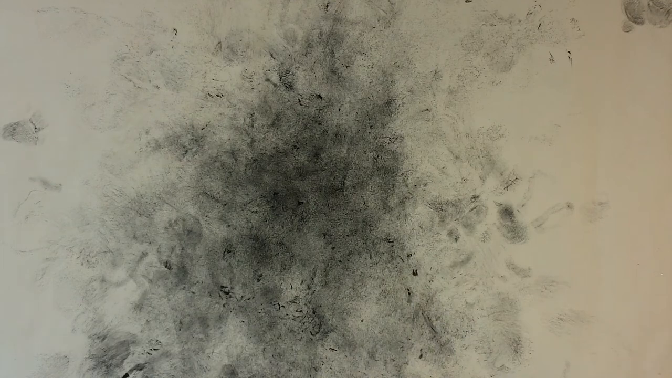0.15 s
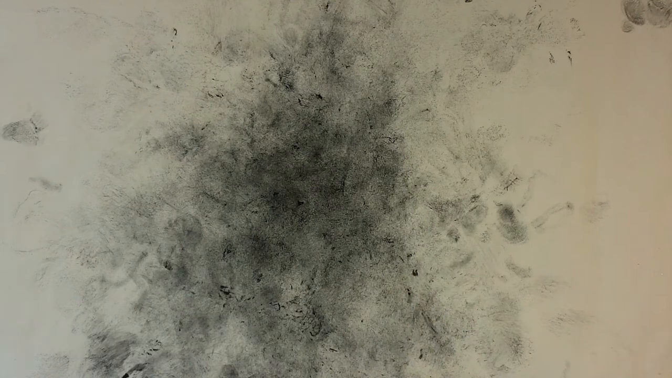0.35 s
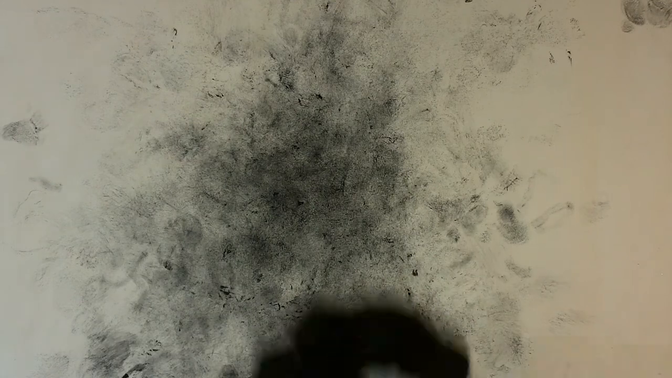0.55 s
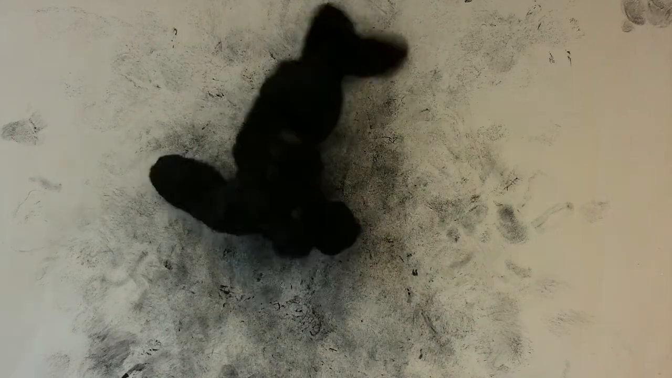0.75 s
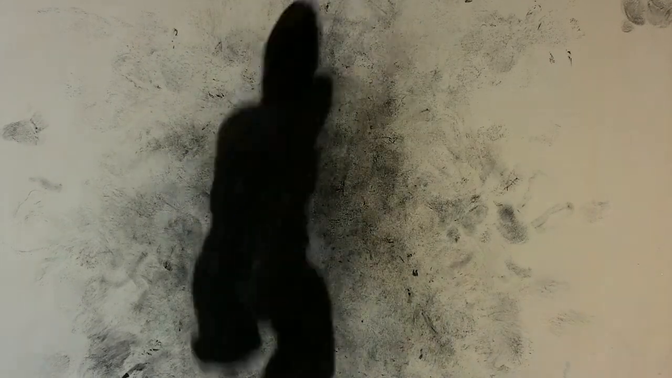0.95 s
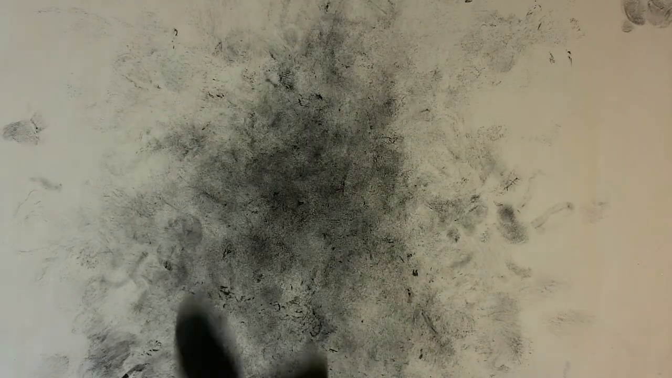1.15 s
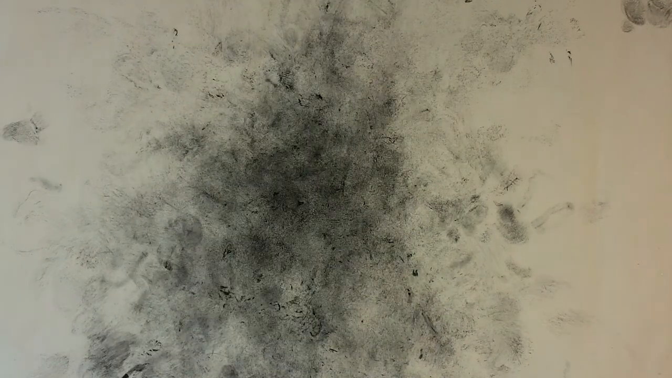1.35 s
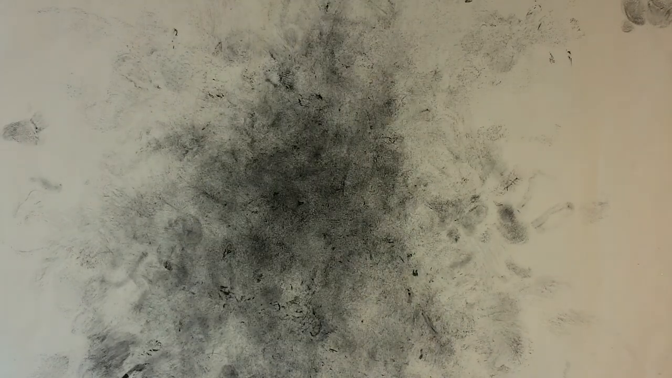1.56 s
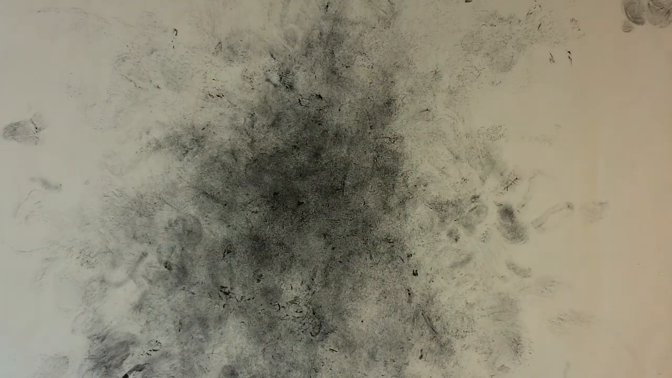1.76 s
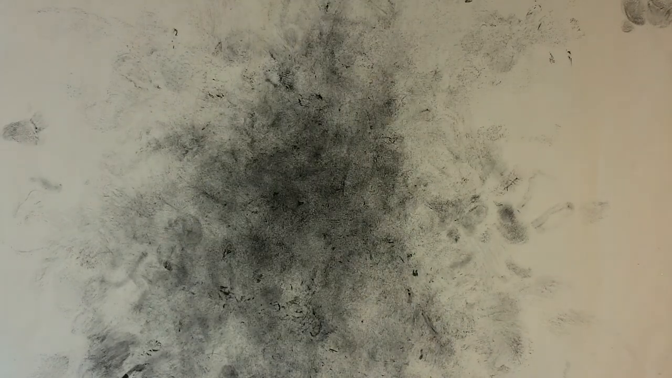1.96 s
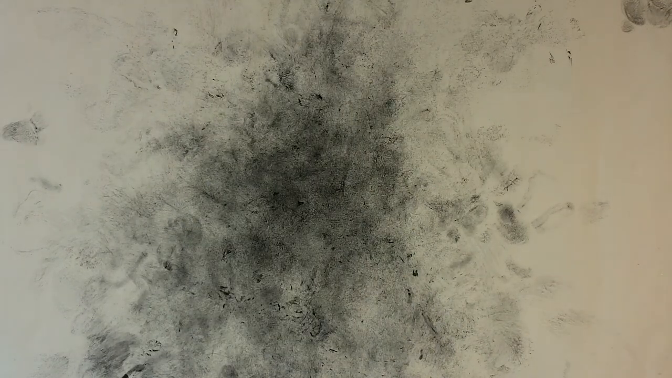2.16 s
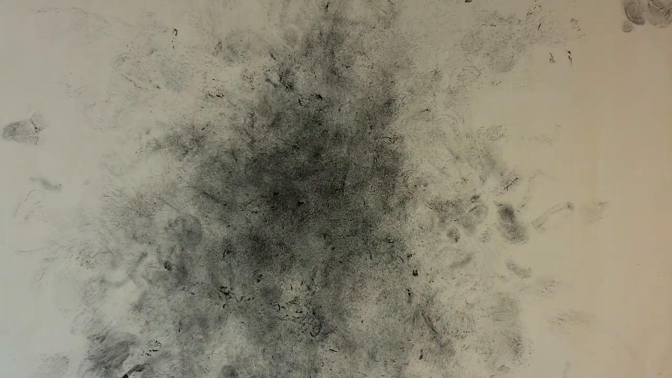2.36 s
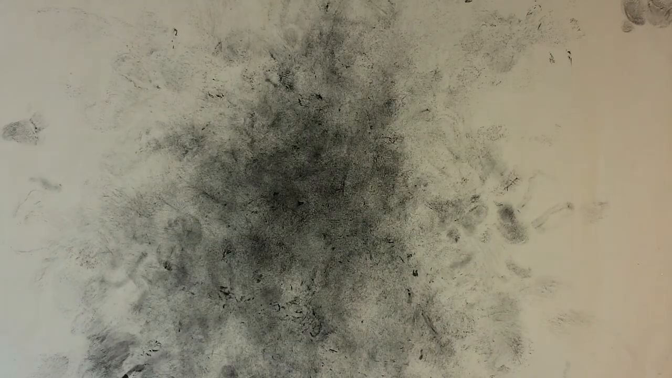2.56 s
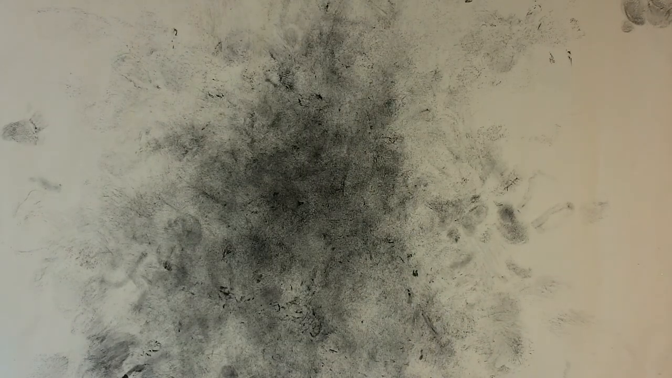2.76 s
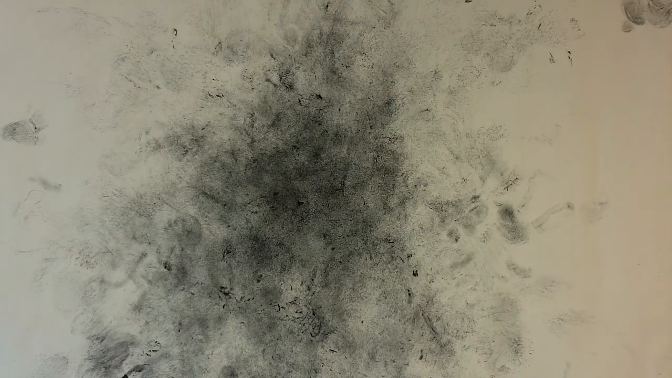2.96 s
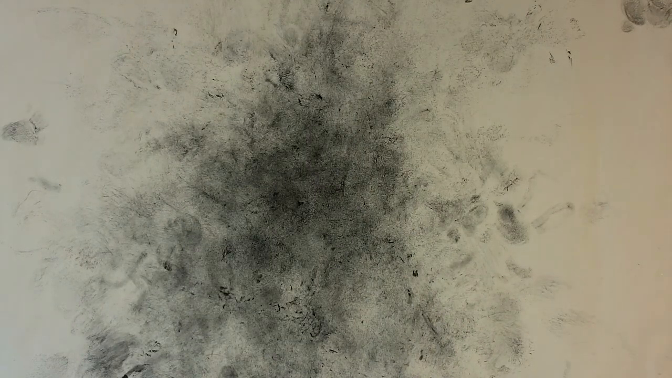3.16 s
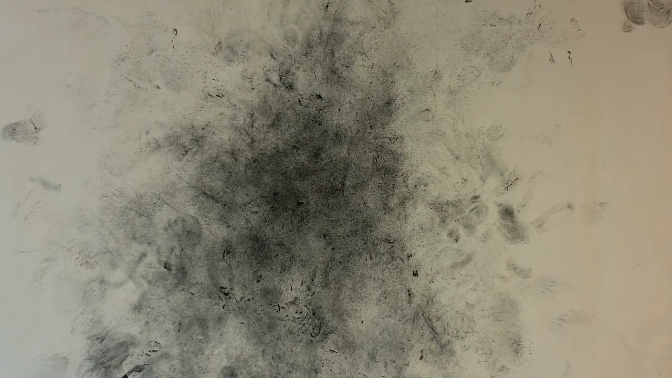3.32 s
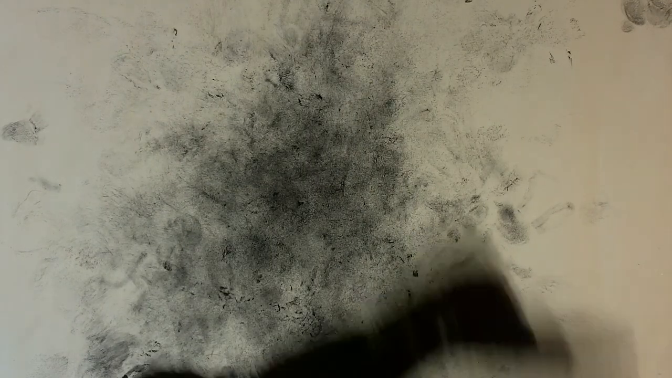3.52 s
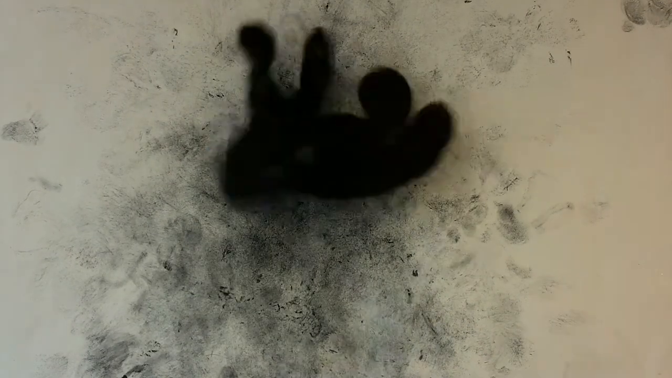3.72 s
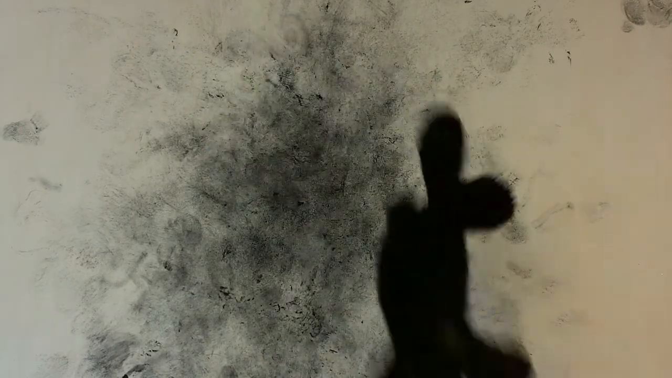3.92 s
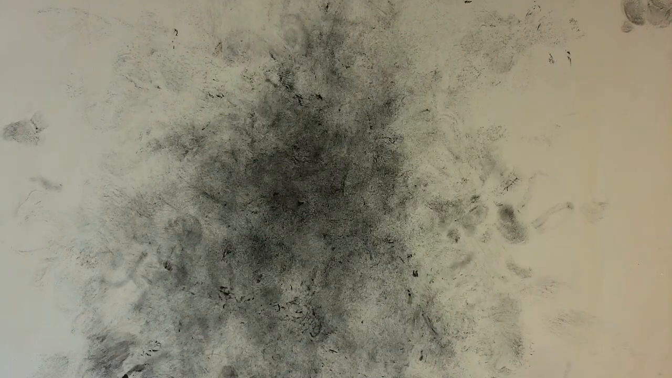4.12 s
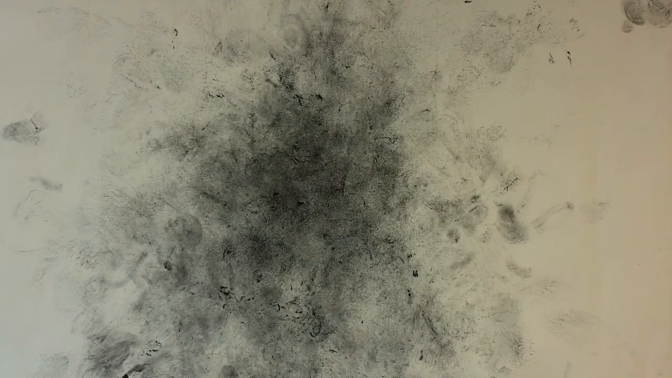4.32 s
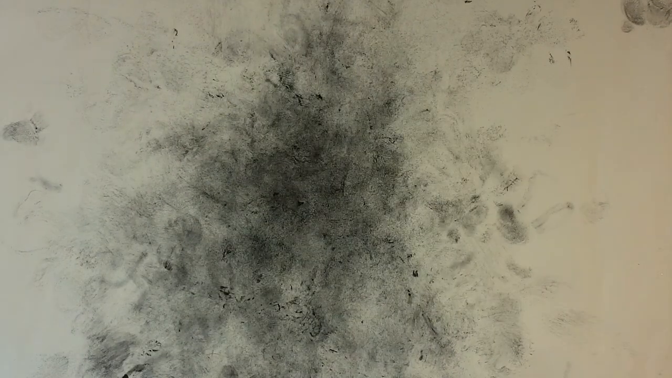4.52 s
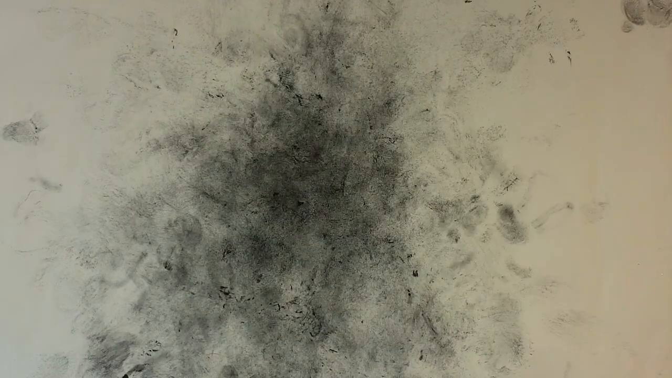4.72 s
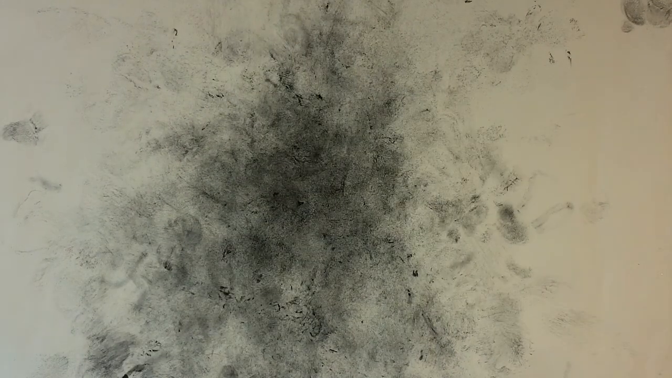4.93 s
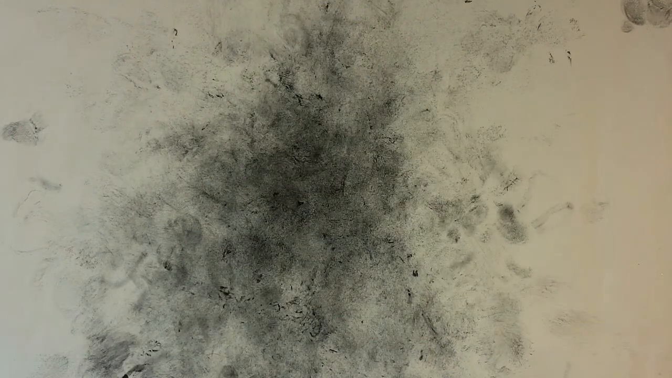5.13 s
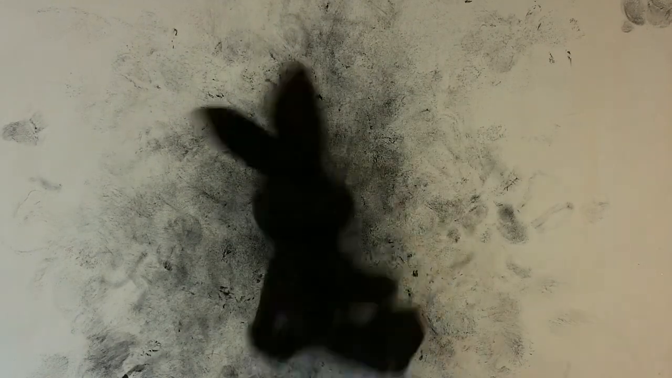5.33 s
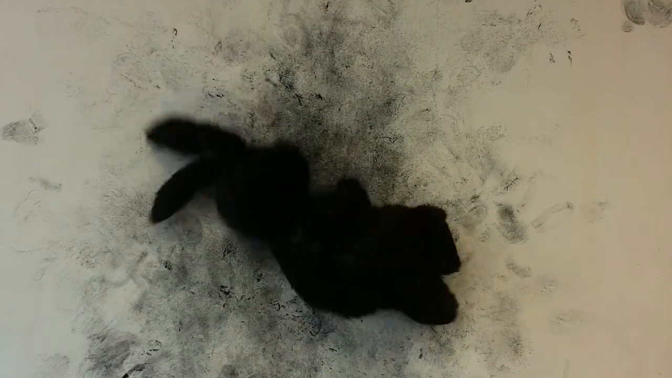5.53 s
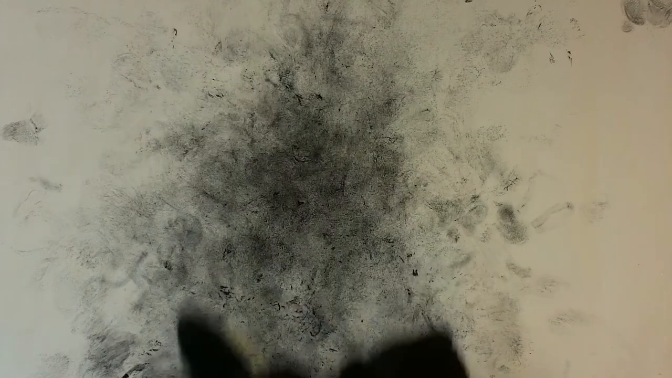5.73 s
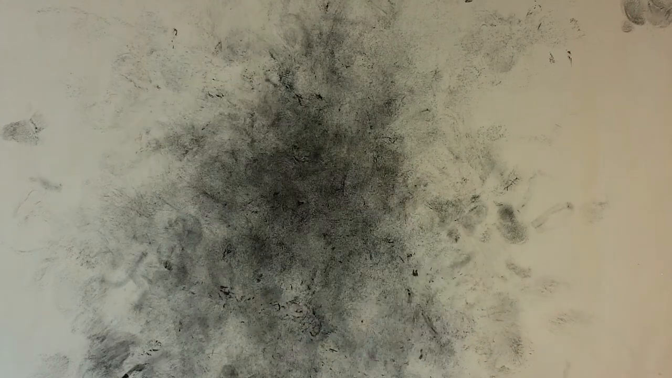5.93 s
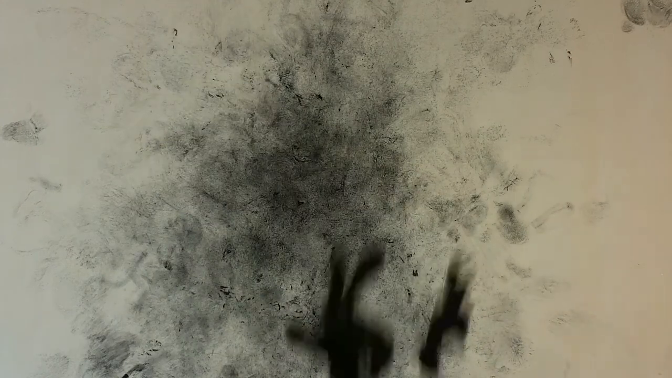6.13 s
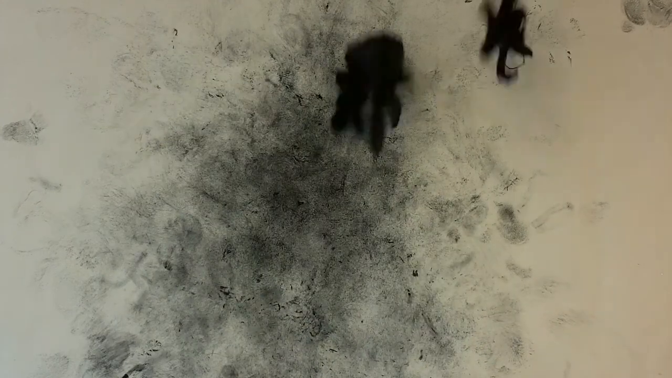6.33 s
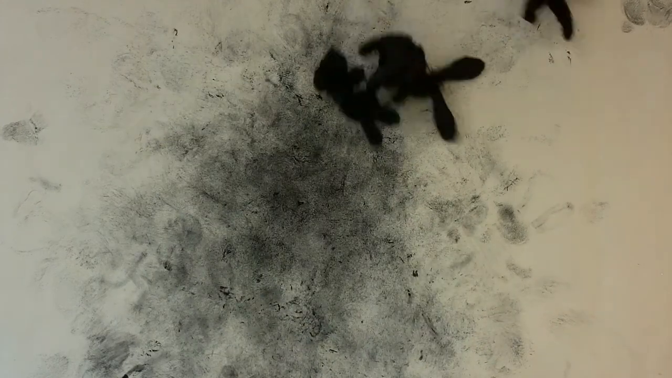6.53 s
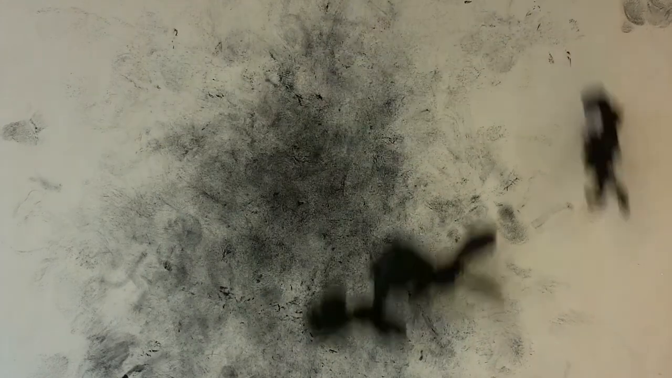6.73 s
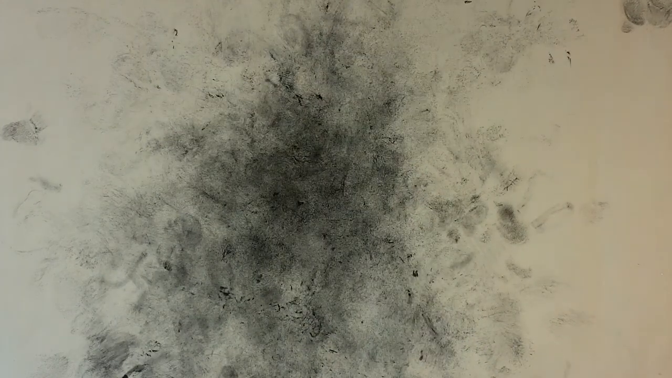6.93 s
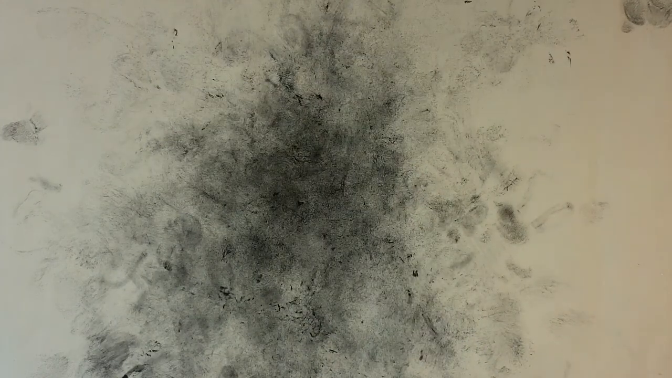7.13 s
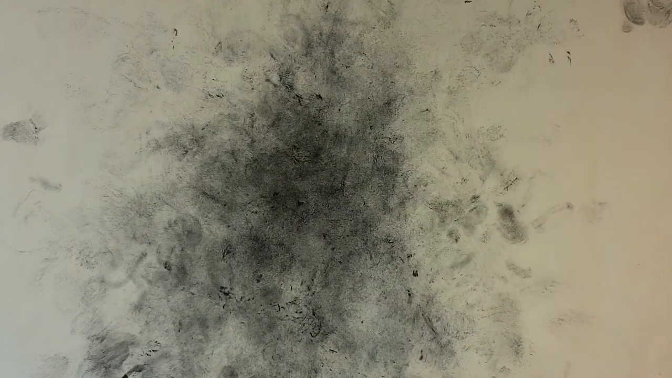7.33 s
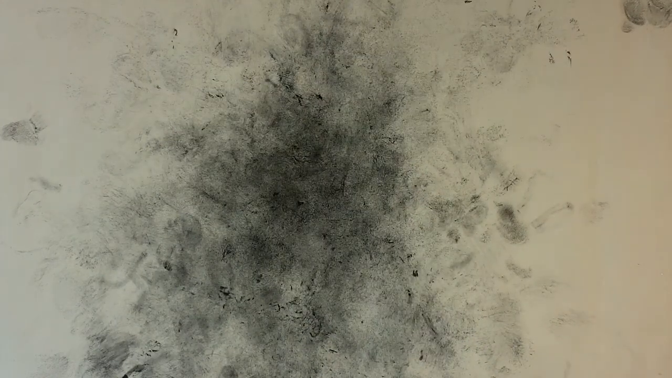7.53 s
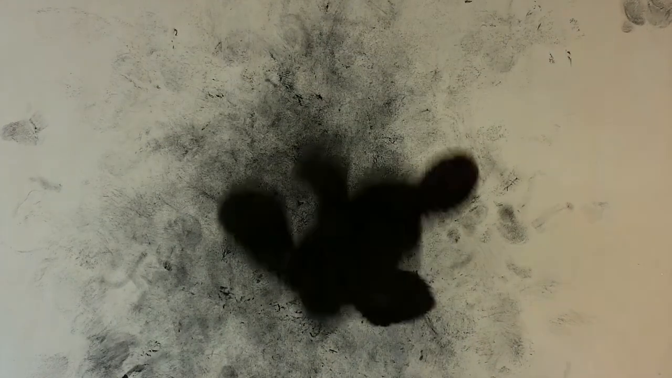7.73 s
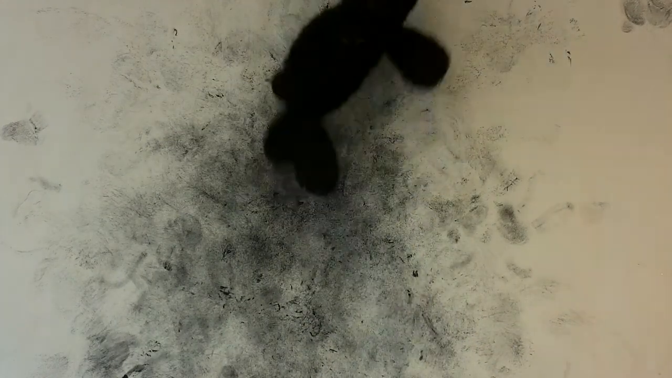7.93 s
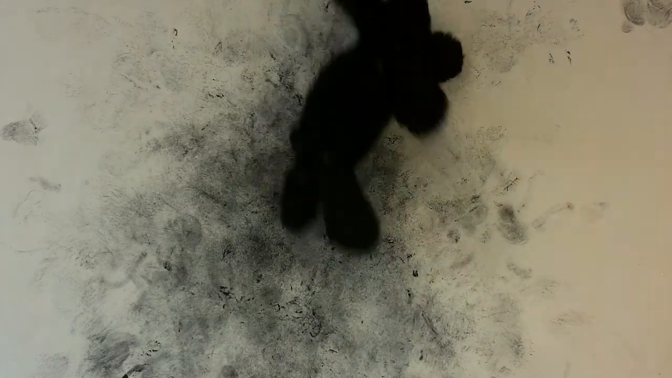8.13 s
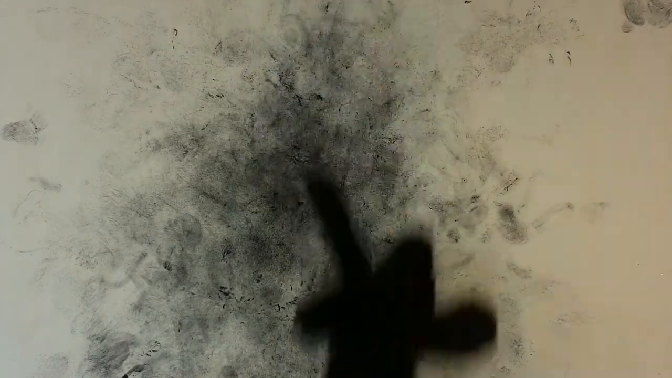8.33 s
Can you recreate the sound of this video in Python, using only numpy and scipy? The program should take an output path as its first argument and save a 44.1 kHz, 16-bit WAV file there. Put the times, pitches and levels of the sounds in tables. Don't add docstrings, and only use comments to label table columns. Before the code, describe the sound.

Plush bodies with some hard parts hit, scrape and settle on a hard surface. Quiet stretches with only faint fabric rustling separate short bursts of ticks, dull knocks and fuzzy scuffs. The heaviest blow falls just before halfway and shakes the surface; the second half is busier. Close, slightly boxy microphone, small room with a short echo and steady low rumble.

```python
import sys
import numpy as np
from scipy import signal
from scipy.fft import rfft, irfft
from scipy.io import wavfile

SR = 44100
rng = np.random.default_rng(int(sys.argv[2]) if len(sys.argv) > 2 else 0)


def invert_db(x):
    u = np.asarray(x, float) / 20
    return 10 ** u


def digitize_waveform(pressure):
    field = np.atleast_2d(pressure).T
    bounded = np.clip(field, -1, 1)
    quanta = np.round(bounded * 32767).astype(np.int16)
    wavfile.write(sys.argv[1], SR, quanta)


N = 369356

# pitch_hz, density_db (per Hz)
ROOM_TONE_SPECTRUM = [(15, 1.5), (35, -0.5), (160, -12), (250, -18), (400, -24), (700, -26.5),
                      (1200, -32.5), (3500, -28.5), (7000, -31.5), (15000, -21)]
ROOM_TONE_DB = -47
# pitch_hz, width_hz, level_db
ROOM_MODES = [(44, 15.6, -60), (67.7, 24, -55.5), (99.9, 9.3, -58), (165, 16.7, -60.5), (222.7, 28, -62),
              (346.7, 11, -72)]
ROOM_T60_S, ROOM_DB = 0.28, -17

# start_s, level_db, pitch_hz, t60_s
BOOMS = [
    (3.785, -36.5, 78.8, 0.37),
    (5.53, -47, 111, 0.18),
]

# start_s, peak_db, pitch_hz
TICKS = [(0.04, -30, 2100), (0.49, -22, 2490), (0.716, -37, 4010), (1.688, -42, 3310), (1.988, -39, 3610),
         (2.156, -39, 3740), (2.331, -41, 3140), (3.047, -37, 2470), (3.279, -20, 4640), (3.287, -22, 3280),
         (3.345, -32, 4940), (3.409, -40, 3340), (3.426, -40, 2270), (3.449, -33, 2400), (3.462, -39, 2370),
         (4.705, -46, 3520), (5.113, -43, 3500), (5.414, -35, 3220), (5.691, -17, 2900), (5.702, -24, 4980),
         (6.439, -20, 2600), (6.53, -18, 3600), (7.154, -22, 3300), (7.282, -28, 3050), (7.49, -22, 3430),
         (8.251, -31, 2580)]
# start_s, peak_db, pitch_hz
KNOCKS = [(0.785, -19, 999), (0.809, -21, 1320), (0.874, -21, 781), (1.43, -41, 703), (2.454, -41, 778),
          (3.775, -8, 1500), (3.79, -3, 1600), (3.795, -9, 759), (3.828, -6, 1500), (4.395, -36, 773),
          (5.05, -46, 912), (5.42, -41, 853), (5.527, -15, 1080), (6.463, -22, 991), (6.547, -23, 977),
          (6.576, -14, 2200), (7.075, -38, 1000), (7.207, -30, 721), (7.246, -20, 1400), (8.041, -23, 1100),
          (8.098, -17, 1250)]
HARD_T60_S, HARD_SPREAD_OCTAVES = 0.022, 1.0
# start_s, peak_db, pitch_hz, t60_s, spread_octaves
HOLLOWS = [(0.549, -28, 3080, 0.07, 0.19), (4.395, -65.5, 403, 0.038, 0.27), (5.521, -14, 2010, 0.1, 0.47),
           (6.666, -32.5, 1590, 0.15, 0.29), (7.134, -37, 527, 0.04, 0.14), (7.174, -56, 415, 0.079, 0.47),
           (7.314, -30.5, 1130, 0.084, 0.17), (7.373, -30.5, 1550, 0.052, 0.16),
           (7.423, -30.5, 1060, 0.038, 0.092), (7.584, -26, 3260, 0.16, 0.19),
           (7.955, -38.5, 1580, 0.23, 0.2), (0.547, -26.5, 506, 0.084, 0.32),
           (1.275, -44.5, 950, 0.06, 0.42), (1.59, -47.5, 503, 0.063, 0.2), (1.685, -41.5, 475, 0.14, 0.18),
           (2.0, -40, 483, 0.096, 0.2), (2.165, -45, 1080, 0.081, 0.42), (3.51, -50, 564, 0.1, 0.12),
           (3.792, -10.5, 1050, 0.14, 0.27), (5.535, -17, 1010, 0.16, 0.25),
           (5.565, -27.5, 734, 0.12, 0.26), (8.06, -25, 950, 0.063, 0.16), (8.11, -24, 1070, 0.063, 0.18)]
# start_s, peak_db
SNAPS = [(0.05, -22), (0.712, -26), (1.72, -30.5), (2.75, -36), (3.28, -6), (4.395, -27), (5.691, -18),
         (6.44, -14), (7.835, -35), (8.147, -22), (3.845, -16), (6.547, -18), (1.431, -33), (3.646, -30)]
SNAP_HZ, SNAP_T60_S, SNAP_SPREAD_OCTAVES = 8000, 0.03, 0.9

# peak_s, scuff_db, rise_and_fall_s, weight_db, sheen_db
RUSTLES = [(0.725, -60, 0.051, 14, 9.5), (1.45, -62, 0.071, 16, -11), (1.559, -52.5, 0.093, 0, -3),
           (1.718, -54.5, 0.093, 3.5, 0.5), (2.041, -50, 0.22, 0, -2.5), (2.2, -57, 0.2, -16, 2),
           (2.33, -64.5, 0.15, 12.5, 0), (2.508, -50.5, .11, 1, -4.5), (2.75, -50, 0.058, -22, -3),
           (3.04, -59, 0.036, 9, -2), (3.47, -56.5, 0.25, -20, -11), (3.693, -49.5, .12, -4.5, 1.5),
           (4.2, -59, 0.52, -2, -8), (4.393, -52.5, 0.044, 12.5, -4), (4.66, -72.5, 0.53, 10, 12),
           (5.2, -58.5, 0.24, -9, 0.5), (5.435, -61, 0.3, 1, 2.5), (5.9, -60, .1, 2, 2),
           (6.04, -57.5, 0.24, -5, -11), (6.174, -46.5, 0.17, -3.5, -4.5), (6.4, -54, 0.31, -12, -12),
           (6.98, -64.5, 0.13, 1, 2), (7.75, -68, 0.09, -8, -5), (7.83, -66, 0.18, -2, 8)]
RUSTLE_SLAP_DB, RUSTLE_SLAP_FOLLOWS = -3, 0.2
# start_s, scuff_db, hold_s, weight_db, sheen_db
BLOWS = [(0.779, -42, 0.0054, 12.5, 1), (1.07, -53.5, 0.0072, -5, 3.5), (3.285, -45, 0.01, 4.5, 15.5),
         (3.773, -18, 0.016, -2.5, -16), (5.498, -40.5, .014, 1, -17), (5.514, -35, 0.044, 6, -14),
         (6.441, -35.5, 0.027, 2.5, 0), (6.573, -30.5, 0.0055, 0.5, -25), (6.579, -53, .015, 2, -9),
         (7.242, -43, 0.01, 6, -4), (7.575, -44.5, 0.04, -8, -10), (8.04, -39, .008, -21, -8),
         (8.092, -33.5, 0.012, 1.5, -4.5)]
BLOW_RISE_S, BLOW_FADE_DB_PER_S = 0.001, 281
# start_s, scuff_db, hold_s, weight_db, sheen_db
SCUFFS = [(0.488, -35, 0.093, -6, -1.5), (0.799, -43.5, 0.1, 10.5, 1.5), (3.823, -24, 0.037, 1.5, -13),
          (4.363, -60.5, .05, 4, -6), (5.543, -43.5, 0.065, 8, -5), (5.694, -43, .012, -4, 0),
          (6.488, -43.5, 0.063, 0.5, 0), (6.543, -41, 0.016, 5, -1), (6.63, -45.5, 0.038, -10, -0.5),
          (7.148, -46, 0.078, -3, -4.5), (7.285, -44.5, 0.079, -4, -4.5), (7.376, -40, 0.056, -12, -2.5),
          (7.965, -45, 0.038, -6, -4.5), (8.051, -47.5, 0.015, 16, -5), (8.122, -42.5, 0.0067, 10.5, -2.5),
          (8.203, -45, 0.15, -3, -7.5)]
SCUFF_RISE_S, SCUFF_FADE_DB_PER_S = 0.004, 142.5
# peak_s, scuff_db, rise_s, fall_s, weight_db
SWELLS = [
    (0.0, -41, .01, 0.21, -5.5),
    (0.2, -50, 0.43, 0.13, -7.5),
    (0.553, -30, 0.046, 0.05, -11),
    (0.848, -32, 0.056, 0.016, -2),
    (1.2, -70, 0.6, 0.35, 11),
    (7.126, -45.5, 0.058, 0.067, -2.5),
    (7.49, -34.5, 0.093, 0.13, -4),
]
SWELL_SHEEN_DB = -3
# peak_s, thud_db, rise_s, fall_s
THUDS = [(0.005, -39.5, 0.02, 0.08), (0.553, -39, 0.12, 0.18), (0.85, -32.5, 0.056, 0.059),
         (3.295, -46, 0.012, 0.052), (3.83, -32, 0.046, 0.17), (5.56, -37.5, 0.037, 0.28),
         (6.48, -33.5, 0.048, 0.053), (6.56, -34, 0.039, .05), (6.6, -36.5, .04, 0.041),
         (7.174, -34, .015, 0.03), (7.21, -36, 0.014, 0.049), (7.53, -52, 0.018, .04),
         (7.29, -42, 0.14, 0.11), (7.5, -38.5, 0.15, 0.22), (8.06, -37, 0.033, 0.044),
         (8.125, -36.5, 0.058, 0.11), (8.32, -44.5, 0.28, 0.045)]
CONTACT_THUD_DB, CONTACT_THUD_FOLLOWS = -7.5, 1
THUD_LAG_S = 0.0092
LOW_FADE_SHARE = 0.73
# level_db of thud, slap, scuff, sheen
STIR_DB = [-71, -67, -77, -70]

# low_hz, high_hz, trim_db
BODY_LAYERS = [
    (163, 406, -4),
    (547, 1780, -3.5),
    (1980, 4370, -3.5),
    (4120, 20000, 1.5),
]
SLIPS_PER_S, SLIP_SPREAD_DB = 5000, 0.5
SNAGS_PER_S, SNAG_CYCLES, SNAG_DB = 600, 35, -10

# pitch_hz, level_db
MIC_RESPONSE = [(20, 1.5), (3700, 0), (4500, 1.5), (4950, 2.5), (5050, -5), (5700, -6.5), (5850, -6.5),
                (7000, -15.5), (7500, -22.5), (8300, -24), (9700, -22), (11500, -22), (13500, -27.5),
                (15200, -33)]
# pitch_hz, width_hz
PORT_NOTCHES = [(4199, 740), (7860, 800), (8807, 850), (12597, 580)]
MIC_CUTOFF_HZ = 15330


def rms_one(x):
    return x / np.sqrt(np.mean(x ** 2) + 1e-20)


def band(x, low_hz, high_hz):
    return signal.sosfilt(signal.butter(2, [low_hz, high_hz], "band", fs=SR, output="sos"), x)


def colour(x, points):
    hz, level_db = np.transpose(points)
    grid_hz = np.maximum(np.arange(2049) * SR / 4096, 1)
    curve_db = np.interp(np.log(grid_hz), np.log(hz), level_db)
    cepstrum = irfft(np.log(invert_db(curve_db)))
    cepstrum[1:2048] *= 2
    cepstrum[2049:] = 0
    impulse = irfft(np.exp(rfft(cepstrum)))
    return signal.fftconvolve(x, impulse)[:N]


def drift(rate_hz):
    r = np.exp(-2 * np.pi * rate_hz / SR)
    warm_up = 9000
    noise = rng.standard_normal(N + warm_up)
    return rms_one(signal.lfilter([1], [1, -2 * r, r * r], noise)[warm_up:])


def room_tone():
    waver = invert_db(ROOM_TONE_DB + 1.0 * drift(1.9))
    out = waver * rms_one(colour(rng.standard_normal(N), ROOM_TONE_SPECTRUM))
    rumble = rng.standard_normal(N)
    for hz, width_hz, level_db in ROOM_MODES:
        mode = band(rumble, hz - width_hz / 2, hz + width_hz / 2)
        out += invert_db(level_db) * rms_one(mode)
    return out


def room(x):
    t = np.arange(int(0.6 * SR)) / SR
    decay = invert_db(-60 * t / ROOM_T60_S)
    low = band(rng.standard_normal(len(t)), 165, 2900) * decay
    high = band(rng.standard_normal(len(t)), 1440, 14000) * decay
    echo = (2.0 * low + high) * (1 - np.exp(-t / 0.0059))
    echo /= np.sqrt(np.sum(echo ** 2))
    return invert_db(ROOM_DB) * signal.fftconvolve(x, echo)[:N]


def boom():
    out = np.zeros(N)
    for start_s, level_db, hz, t60_s in BOOMS:
        t = np.maximum(np.arange(N) / SR - start_s, 0)
        envelope = invert_db(level_db - 60 * t / t60_s) * (1 - np.exp(-t * hz))
        out += envelope * np.sin(2 * np.pi * hz * t)
    return out


def touches(table, click, rise_s, trim_db):
    length = 4000
    out, t = np.zeros(N + length), np.arange(length) / SR
    sprays = rng.standard_normal((len(table), length))
    for noise, (start_s, peak_db, hz, t60_s, octaves) in zip(sprays, table):
        blow = noise * invert_db(-60 * t / t60_s) * (1 - np.exp(-t / rise_s))
        blow[20] += click
        spread = 2 ** max(octaves, 0.1)
        pitched = band(blow, hz / spread, hz * spread)
        blow = pitched + 0.04 * click * blow
        at = round(start_s * SR)
        out[at:at + length] += invert_db(peak_db + trim_db) * blow / np.abs(blow).max()
    return out[:N]


def hard_parts():
    table = [(*row, HARD_T60_S, HARD_SPREAD_OCTAVES) for row in [*KNOCKS, *TICKS]]
    return touches(table, click=5.5, rise_s=0.0002, trim_db=-0.5)


def hollows():
    return touches(HOLLOWS, click=0, rise_s=0.00053, trim_db=-2.5)


def snaps():
    table = [(*row, SNAP_HZ, SNAP_T60_S, SNAP_SPREAD_OCTAVES) for row in SNAPS]
    return touches(table, click=3.0, rise_s=0.0003, trim_db=0)


def contact_levels():
    contacts = []
    for s, db, hold, weight, sheen in BLOWS:
        contacts.append((s, db, BLOW_RISE_S, hold, 20 / BLOW_FADE_DB_PER_S, weight, sheen))
    for s, db, hold, weight, sheen in SCUFFS:
        contacts.append((s, db, SCUFF_RISE_S, hold, 20 / SCUFF_FADE_DB_PER_S, weight, sheen))
    for s, db, rise, fall, weight in SWELLS:
        contacts.append((s, db, rise, 0, fall, weight, SWELL_SHEEN_DB))

    moves = []
    for *shape, weight, sheen in contacts:
        thud = CONTACT_THUD_DB + CONTACT_THUD_FOLLOWS * weight
        moves.append((*shape, thud, weight, 0, sheen))
    for s, db, span, weight, sheen in RUSTLES:
        slap = RUSTLE_SLAP_DB + RUSTLE_SLAP_FOLLOWS * weight
        moves.append((s, db, span, 0, span, weight, slap, 0, sheen))
    for s, db, rise, fall in THUDS:
        moves.append((s, db, rise, 0, fall, 0, -np.inf, -np.inf, -np.inf))

    power = invert_db(np.array(STIR_DB))[:, None] ** 2 * np.ones(N)
    fade_share = np.array([[LOW_FADE_SHARE], [LOW_FADE_SHARE], [1], [1]])
    for s, level_db, rise, hold, fall, *layer_db in moves:
        first = max(int((s - 2 * rise) * SR), 0)
        last = min(int((s + hold + 2.5 * fall) * SR), N)
        t = np.arange(first, last) / SR - s
        before = np.maximum(-t / rise, 0)
        after = np.maximum((t - hold) / (fall * fade_share), 0)
        peak_db = np.array(layer_db)[:, None] + level_db
        power[:, first:last] += invert_db(peak_db - 20 * (before + after)) ** 2
    r = np.exp(-1 / (THUD_LAG_S * SR))
    power[0] = signal.lfilter([1 - r], [1, -r], power[0])
    return np.sqrt(power)


def snags():
    sizes = invert_db(3.0 * np.minimum(rng.exponential(1, N), 3))
    catches = sizes * (rng.random(N) < SNAGS_PER_S / SR)
    dealt = rng.integers(0, 16, N)
    out = np.zeros(N)
    for k, hz in enumerate(np.geomspace(500, 5200, 16)):
        r = invert_db(-60 * hz / (SNAG_CYCLES * SR))
        w = 2 * np.pi * hz / SR
        mine = catches * (dealt == k) + 1e-18
        out += np.sqrt(hz) * signal.lfilter([0, np.sin(w)], [1, -2 * r * np.cos(w), r * r], mine)
    return invert_db(SNAG_DB) * rms_one(out)


def fur(clump_db):
    sizes = invert_db(SLIP_SPREAD_DB * np.minimum(rng.exponential(1, N), 5)) * rng.choice([-1, 1], N)
    slips = sizes * (rng.random(N) < SLIPS_PER_S / SR) * invert_db(clump_db * drift(140))
    slips = rms_one(slips) + 1.6 * rng.standard_normal(N)
    slips = rms_one(slips) + snags()
    out = np.zeros(N)
    sign = 1
    for gain, (low_hz, high_hz, trim_db) in zip(contact_levels(), BODY_LAYERS):
        steady = band(slips, low_hz, min(high_hz, 7500))
        layer = band(slips * gain * invert_db(trim_db), low_hz, high_hz)
        out += sign * layer / np.sqrt(np.mean(steady ** 2))
        sign = -sign
    return out


def scene():
    near = fur(clump_db=0.9) + hard_parts() + hollows() + boom() + snaps()
    return (near + room(near) + room_tone())[None]


def roll_off(x):
    return signal.sosfilt(signal.butter(12, 15630, fs=SR, output="sos"), x)


def record(dry):
    x = colour(dry[0], MIC_RESPONSE)
    for hz, width_hz in PORT_NOTCHES:
        x = signal.lfilter(*signal.iirnotch(hz, hz / width_hz, SR), x)
    x = signal.sosfilt(signal.ellip(12, 0.5, 45, MIC_CUTOFF_HZ, fs=SR, output="sos"), x)
    return roll_off(x[None])


dry = scene()
out = record(dry)
digitize_waveform(out)
```